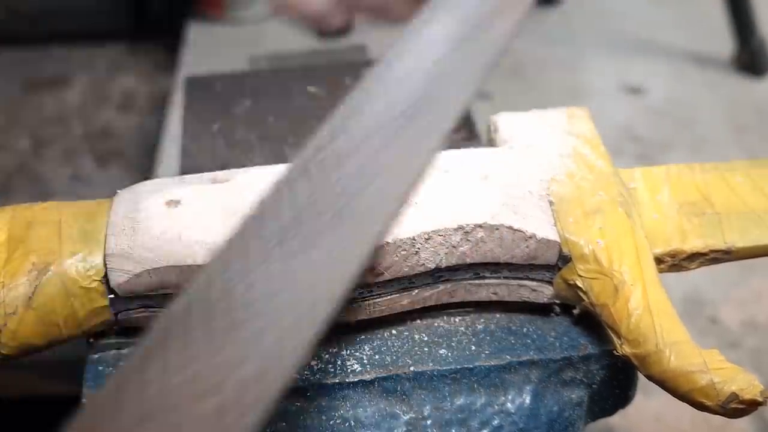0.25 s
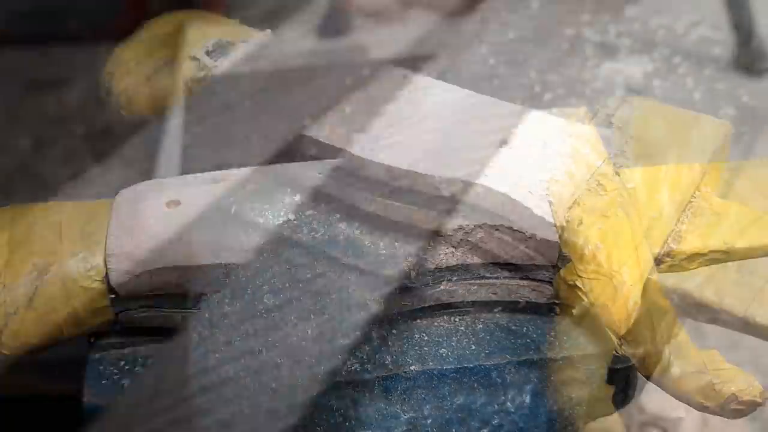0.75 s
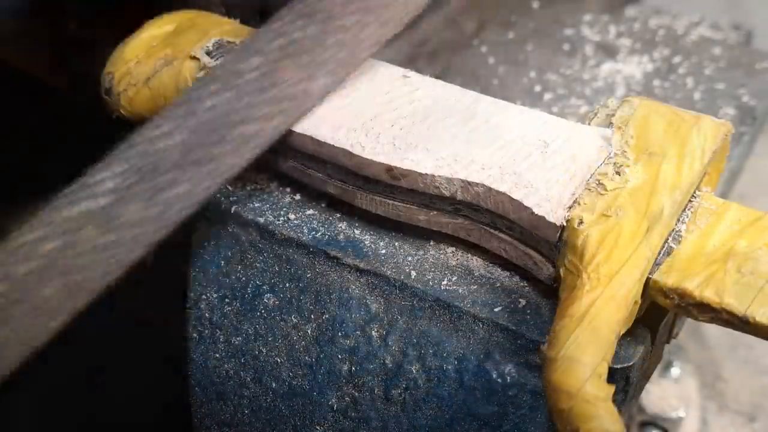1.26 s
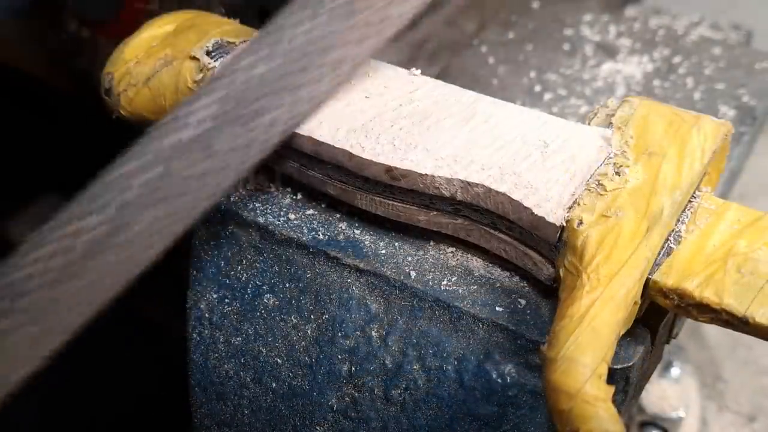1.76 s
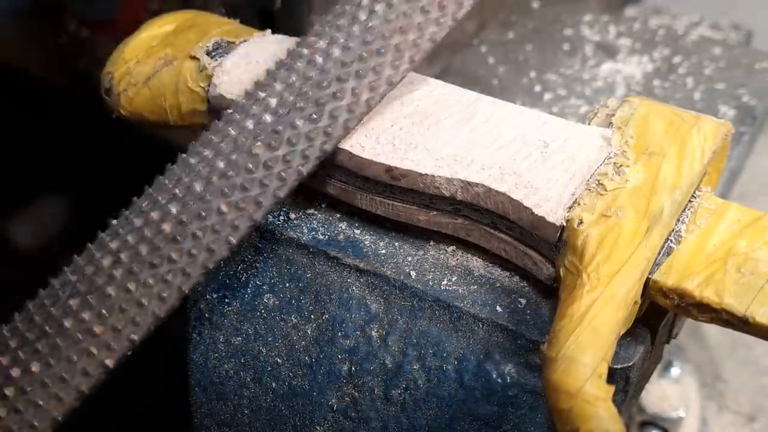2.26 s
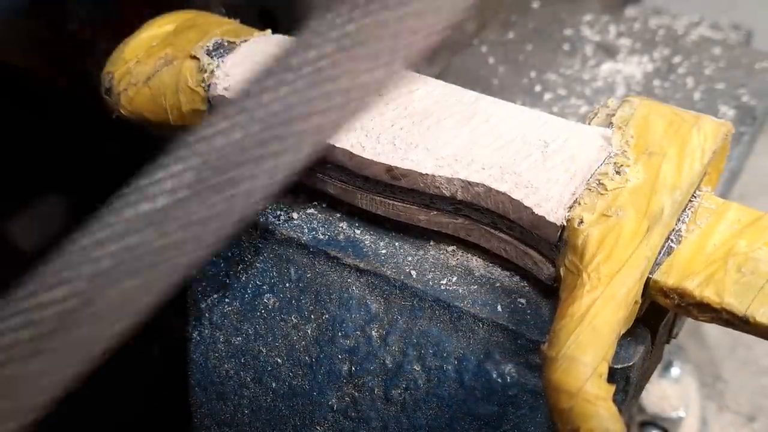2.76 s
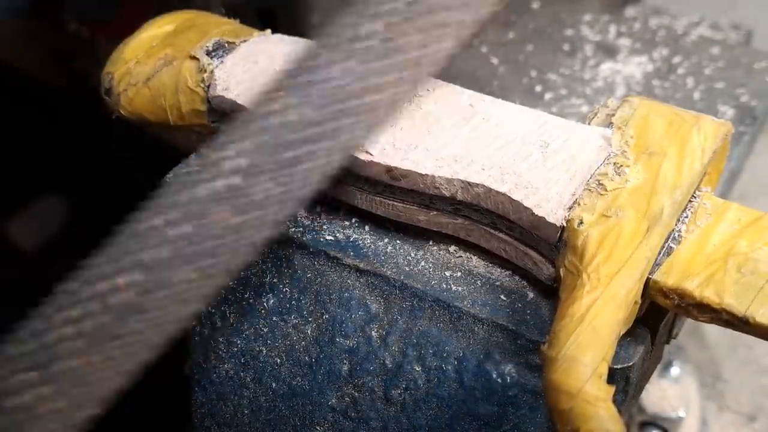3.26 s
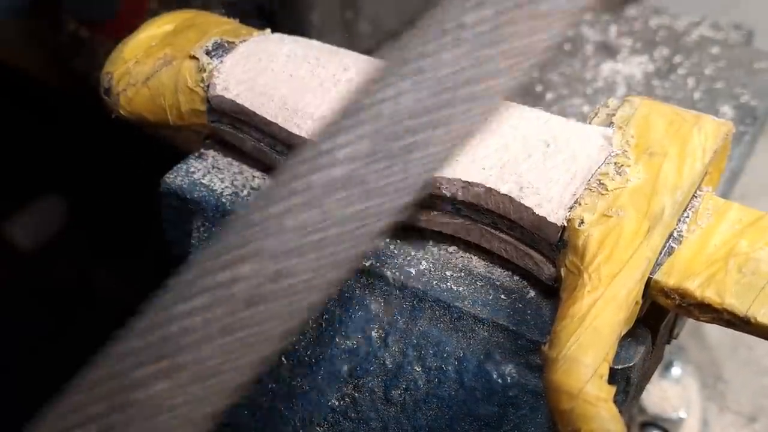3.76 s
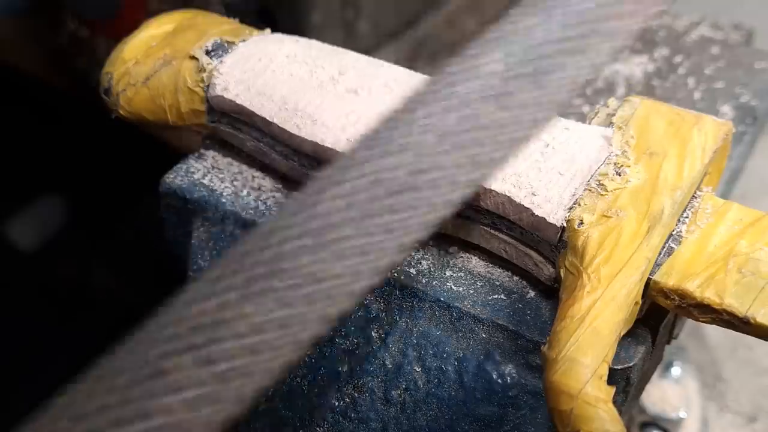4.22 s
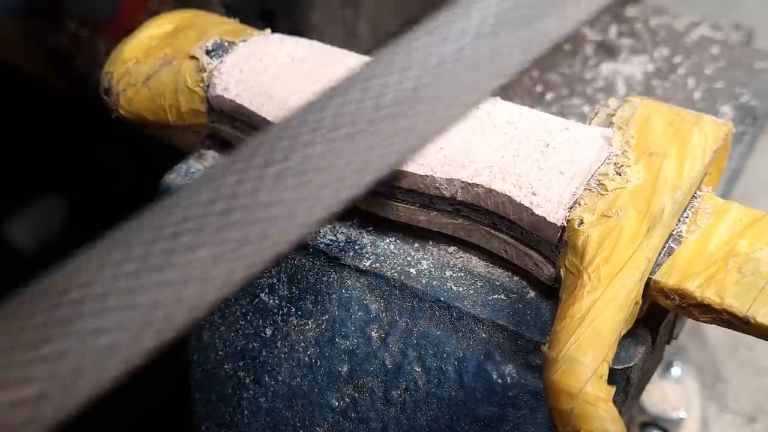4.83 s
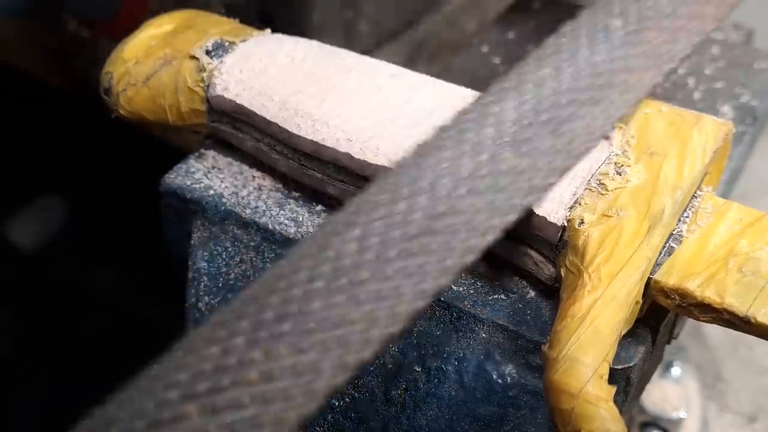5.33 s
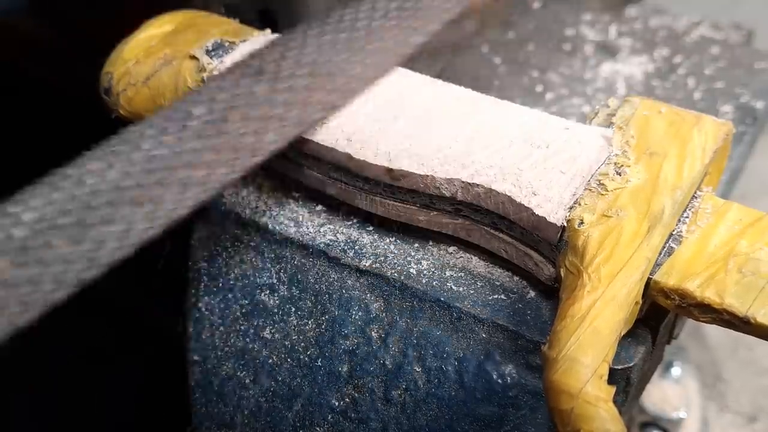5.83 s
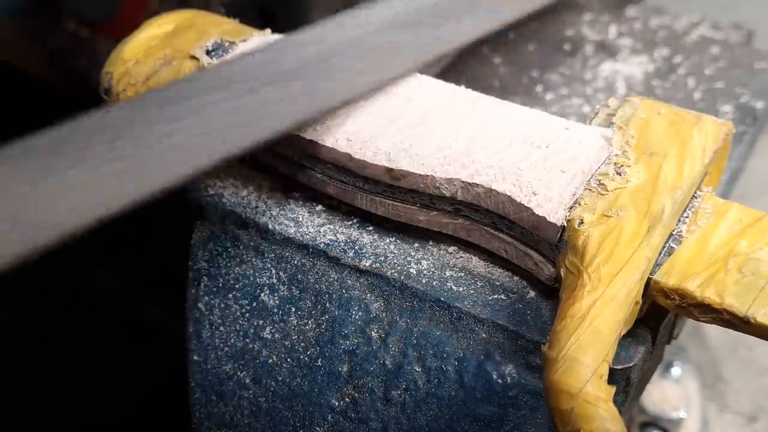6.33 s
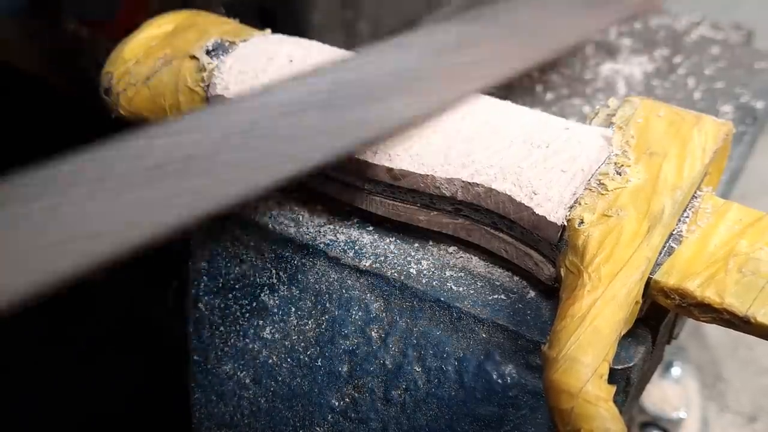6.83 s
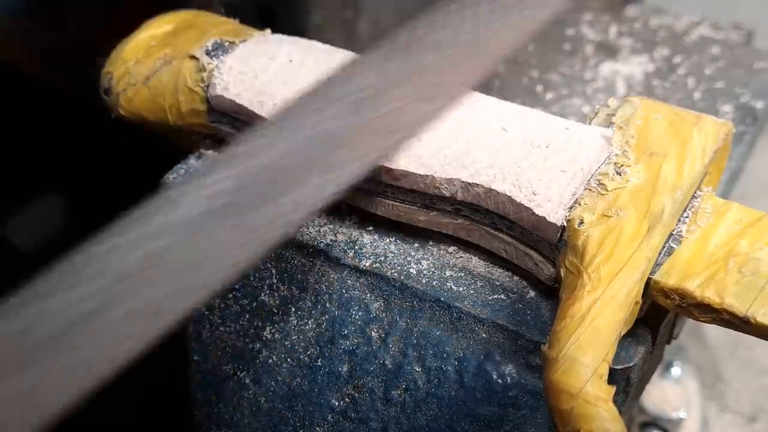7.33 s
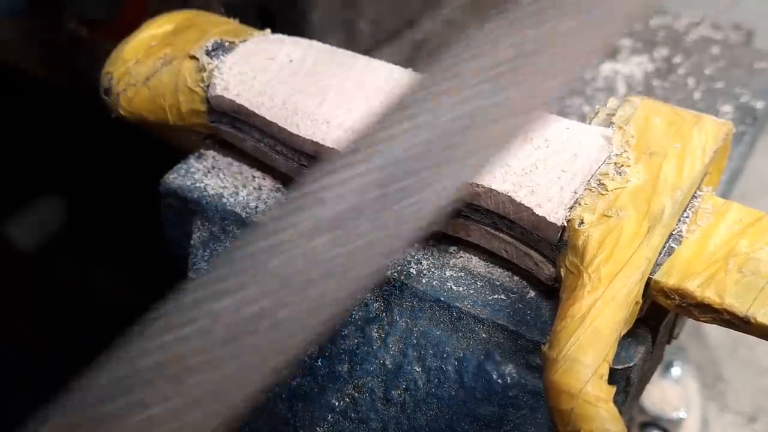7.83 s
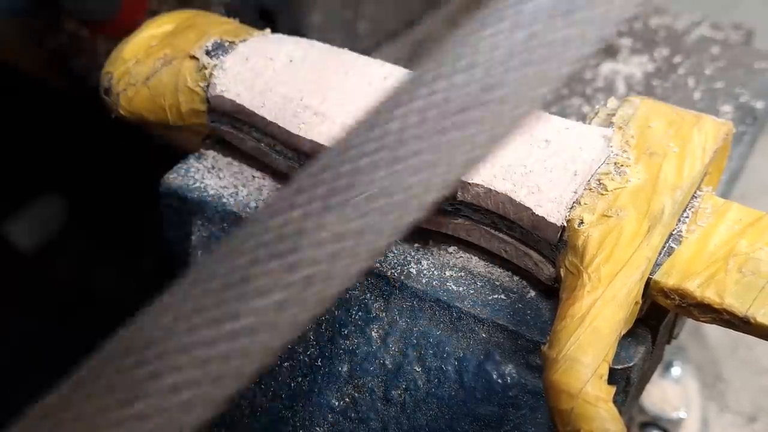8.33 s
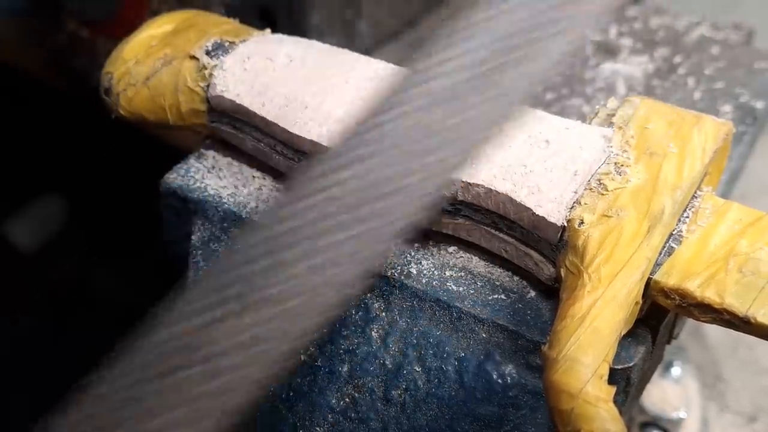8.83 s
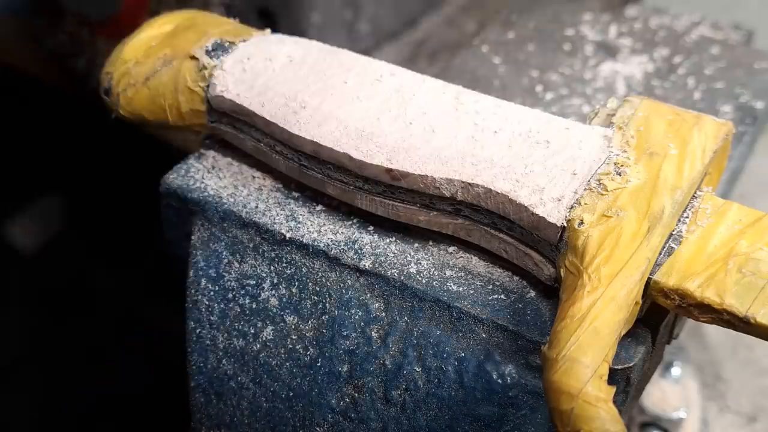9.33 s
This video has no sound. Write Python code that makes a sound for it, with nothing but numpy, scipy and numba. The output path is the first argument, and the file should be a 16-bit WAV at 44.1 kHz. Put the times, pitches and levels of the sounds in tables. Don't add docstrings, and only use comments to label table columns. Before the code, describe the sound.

Dry, close filing in a still workshop: gritty rasp teeth bite wood with a dense, ringing steel scratch. After a few hesitant strokes and set-down ticks comes rapid to-and-fro scraping, with a brief break in pace before a fuller run, then slower, longer strokes to the end. Low wooden judder sits under each push, with little room echo and faint air noise.

```python
import sys
import numpy as np
from scipy import signal
from scipy.fft import rfft, irfft
from scipy.io import wavfile
from scipy.ndimage import uniform_filter1d
from numba import njit

SR = 44100
rng = np.random.default_rng(int(sys.argv[2]) if len(sys.argv) > 2 else 0)


def persist_wave(psi):
    counts = np.round(np.clip(psi, -1, 1) * 32767).astype(np.int16)
    wavfile.write(sys.argv[1], SR, np.atleast_2d(counts).T)


def amplitude_ratio(level_db):
    exponent = np.asarray(level_db, float) / 20
    return 10 ** exponent


N = 422478
T = np.arange(N) / SR


def unit(x):
    return x / np.sqrt(np.mean(x ** 2))


def walk(rate):
    hold = int(SR / rate)
    levels = rng.standard_normal(N // 20 + 1)[:N // hold + 1]
    return uniform_filter1d(np.repeat(levels, hold), hold)[:N]


@njit
def moving_resonance(x, hz, width):
    y, band, low = np.empty(len(x)), 0., 0.
    for i in range(len(x)):
        g, k = np.tan(np.pi * hz[i] / SR), width[i] / hz[i]
        v = (band + g * (x[i] - low)) / (1 + g * (g + k))
        band, low, y[i] = 2 * v - band, low + 2 * g * v, k * v
    return y


def body(x, modes):
    total = 0
    for k, (hz, width, db) in enumerate(modes):
        b, a = signal.iirpeak(hz, hz / width, SR)
        total = total + (-1) ** k * amplitude_ratio(db) * signal.lfilter(b, a, x)
    return total


# (f/Hz, level/dB per Hz)
SHOP_SPECTRUM = [(18, -40), (30, -14), (195, -18.5), (296, -19.5), (1820, -24.5), (3540, -25.5),
                 (5380, -30), (10700, -35.5), (13900, -60.5), (22000, -120)]
SHOP_DB = -80.5
EARLY_SHOP_DB, EARLY_UNTIL_S = -2, 0.78


def shop():
    hz, db = np.transpose(SHOP_SPECTRUM)
    colour = amplitude_ratio(np.interp(np.log(np.fft.rfftfreq(N, 1 / SR) + 1), np.log(hz), db))
    air = unit(irfft(rfft(rng.standard_normal(N)) * colour, N))
    return air * amplitude_ratio(SHOP_DB + EARLY_SHOP_DB * (T < EARLY_UNTIL_S) + 1.5 * walk(11.0))


# (t/s, length/s, blade level/dB, swell over the stroke/dB, vice shudder level/dB)
FIRST_PUSHES = [(.182, .19, -34, 6.5, -34.5), (.62, 0.19, -36, -5.5, -40.5), (.92, 0.083, -43, 6.5, -45.5),
                (1.066, .165, -42, 0, -48.5)]
FIRST_PULLS = [(0.13, 0.042, -53, -11.5, -45.5), (.788, 0.1, -45, 0, -43.5), (1.036, .06, -44, -2, -47)]
QUICK_PUSHES = [(1.315, 0.11, -31, 0.15, -29), (1.528, 0.095, -27.4, -3.6, -29),
                (1.718, 0.08, -29, 1.8, -29.5), (1.907, 0.067, -36, 11, -30.5),
                (2.253, 0.1, -32, -3.5, -29), (2.444, 0.091, -30, -3.9, -26.5),
                (2.807, 0.12, -28, -11.5, -22), (3.007, 0.11, -27, -3, -23),
                (3.217, 0.104, -26, -0.5, -30.5), (3.418, 0.12, -26, 4, -20.5),
                (3.638, 0.097, -24.5, -5.5, -24), (3.831, 0.089, -27.5, -1, -29.8),
                (4.011, 0.099, -29, -2, -29), (4.21, 0.1, -28.5, -4, -32.5), (4.41, 0.1, -26.5, 4.5, -31),
                (4.605, 0.094, -28.5, -7, -47), (4.793, 0.11, -36, -13, -44.5)]
QUICK_PULLS = [(1.259, 0.064, -40, 0, -32.5), (1.426, 0.098, -44.5, 8, -36.5), (1.619, 0.093, -31, 0, -40),
               (1.803, 0.095, -41, -6, -40.5), (1.996, 0.077, -41.2, -19, -44),
               (2.171, 0.082, -64.5, 25, -52), (2.348, 0.094, -32.5, -0.5, -37.5),
               (2.529, 0.055, -37, 17, -35.5), (2.571, 0.051, -41, -16.5, -37.5),
               (2.745, 0.063, -40.5, 1, -57), (2.924, 0.089, -26.5, 0.5, -35),
               (3.136, 0.082, -25, -3.5, -43.5), (3.372, 0.046, -39.5, -6.5, -76.5),
               (3.554, 0.078, -29.5, 4.5, -42), (3.737, 0.092, -29.5, 0, -40),
               (3.921, 0.086, -31, 2, -46.5), (4.112, 0.099, -27, -1.5, -46),
               (4.315, 0.099, -29, -2, -45.5), (4.513, 0.094, -32, -9, -56), (4.704, 0.094, -31, -1, -49.8)]
LONG_PUSHES = [(5.051, 0.12, -32, 2.5, -35.5), (5.337, 0.11, -30.5, -1, -34),
               (5.619, 0.14, -32.2, 0.2, -35), (5.932, 0.14, -32.5, -5.5, -39),
               (6.237, 0.13, -33, 2.5, -32.5), (6.521, 0.15, -33, -3, -32.5), (6.854, 0.14, -34.5, -4, -30),
               (7.183, 0.14, -35.5, 4.5, -35.5), (7.508, 0.16, -27, -11.5, -29.5),
               (7.844, 0.176, -25, -4, -28), (8.214, 0.16, -26, 9, -25), (8.558, 0.14, -27.5, -1.5, -29),
               (8.856, 0.15, -27.5, -2, -29.5), (9.171, 0.12, -26.0, 5, -32)]
LONG_PULLS = [(4.912, 0.12, -31.5, -13.5, -60), (5.179, 0.14, -28.5, 1, -64),
              (5.466, 0.14, -29.5, 0.5, -63), (5.778, 0.14, -30, -1, -54.5),
              (6.081, 0.14, -36, -7.5, -41.5), (6.417, 0.096, -36.5, -15.5, -41),
              (6.679, 0.17, -34, -2, -52), (7.015, 0.17, -32.5, -2, -44), (7.331, 0.16, -32, -1, -66.5),
              (7.739, 0.095, -32.5, -7, -42), (8.027, 0.18, -31.5, -17, -58),
              (8.408, 0.16, -35.5, -17.5, -58.5), (8.72, 0.13, -27, -6, -60.5),
              (9.032, 0.13, -30.5, -11.5, -60.5)]
HOVERS = [
    (0.401, .2, -86, 1.5, -79.5),
]
HAND = {"first push": (0.38, 0.37), "first pull": (0.18, 0.48), "quick push": (.42, 0.4545),
        "quick pull": (0.55, 0.73), "long push": (.33, 0.44), "long pull": (0.36, 0.5), "hover": (.45, .45)}
BITE = {"first push": (-1.5, -1.5, -2, -3, -12.5), "first pull": (-17, -20, -15.5, -26.5, -10.5),
        "quick push": (-13.5, -10, -7.5, -10.5, -8.5), "quick pull": (-17, -12, -16.5, -12.5, -6.5),
        "long push": (-7, -10, -7, -9, -14), "long pull": (-21, -22, -16, -8, -9.5),
        "hover": (-27, -27.5, -4, -3, 1.5)}
LANDINGS = [.186, 1.04, 3.382, 6.087, 6.427, 6.687, 7.752]
# (t/s, blade resonance f/Hz, roll of the wrist, tearing level/dB)
PUSH_GRIP = [(.28, 4190, .06, 3), (0.698, 3780, -0.066, 3.5), (0.961, 2800, 0.002, -7.5),
             (1.129, 4170, .06, -3), (1.37, 2960, -.02, 2), (2.5, 2854, -.05, 2), (3.061, 3330, .04, 4),
             (3.701, 3376, 0.0093, -5.5), (4.46, 3980, 0.054, -4.5), (4.85, 3830, 0.11, 12),
             (5.11, 4010, -0.31, -4.5), (5.7, 4060, -0.06, 0.5), (6.0, 3345, 0.27, 5.5),
             (6.921, 3400, 0.26, 9), (7.248, 4180, -0.085, 1), (7.929, 3170, -.04, -11.5),
             (8.629, 3280, 0.18, 1.5), (9.24, 3200, -0.15, -2.5)]
PULL_GRIP = [(.15, 3840, -.05, -6.5), (.5, 2850, .05, -7), (1.0, 2920, -.08, 0), (1.47, 2450, 0.033, 7.5),
             (1.66, 2820, -.08, 5.5), (2.97, 2700, -.08, 2), (3.4, 2900, .03, 1), (3.78, 3570, -.04, -9),
             (4.16, 3370, 0.03, -4), (4.55, 3500, -0.14, 5.5), (4.97, 3420, -0.13, -3.5),
             (5.25, 3660, .12, -8.5), (5.53, 3500, -0.037, -5), (5.85, 3186, -.2, 2), (6.14, 3166, -.24, 3),
             (6.46, 2805, -0.052, 3), (7.4, 3130, 0.0045, 1), (8.1, 3044, 0.017, 5)]
LANDING_S = .005
SPEED_POWER = 2.03
LEVEL_DB, VICE_DB, SWELL_GAIN = 0.5, -4, 1.54
SHUDDER_PEAK = 0.59
ROLL_RING_DB, ROLL_HISS_DB = -24, 44.5
SHUDDER_WOOD = 0.067
BENCH_LAG = 0.21


def strokes():
    ring, vice, bench = np.zeros(N), np.zeros(N), np.zeros(N)
    grip = np.tile([[3000.], [-20], [-20], [0], [0]], N)
    tables = FIRST_PUSHES, FIRST_PULLS, QUICK_PUSHES, QUICK_PULLS, LONG_PUSHES, LONG_PULLS, HOVERS
    for manner, rows in zip(HAND, tables):
        up, down = HAND[manner]
        hiss_db, wood_db, early_db, late_db, bench_db = BITE[manner]
        when, *columns = np.transpose(PUSH_GRIP if "push" in manner else PULL_GRIP)
        for s, length, db, swell_db, vice_db in rows:
            span = slice(int(s * SR), int((s + 1.3 * length) * SR))
            u = (T[span] - s) / length
            landing = [t for t in LANDINGS if abs(t - s) < .015]
            rise = (T[span] - landing[0]) / LANDING_S if landing else u / up
            speed = np.sin(np.pi / 2 * np.clip(np.minimum(rise, (1 - u) / down), 0, 1))

            hz, roll, tear_db = (np.interp(s + length / 2, when, column) for column in columns)
            roll = roll * (np.clip(u, .2, .8) - .5) / .6
            ring_db = db + LEVEL_DB + SWELL_GAIN * swell_db * (u - .5) + ROLL_RING_DB * roll
            now = speed ** SPEED_POWER * amplitude_ratio(ring_db)
            hiss = hiss_db + tear_db + ROLL_HISS_DB * roll
            wood = wood_db + SHUDDER_WOOD * (vice_db - db + 3) + 0 * u
            hold = np.stack([hz * (1 + roll), hiss, wood, roll, u])
            grip[:, span] = np.where(now >= ring[span], hold, grip[:, span])
            ring[span] = np.maximum(ring[span], now)

            start_db = early_db - (6 if landing else 25)
            course_db = [start_db, early_db, 0, late_db, late_db - 39]
            shake = amplitude_ratio(vice_db + VICE_DB + np.interp(u, [0, .2, SHUDDER_PEAK, .9, 1.3], course_db))
            vice[span] = np.maximum(vice[span], shake)
            bench_shake = shake * amplitude_ratio(bench_db - BENCH_LAG * (vice_db + 39))
            bench[span] = np.maximum(bench[span], bench_shake)
    return ring, vice, bench, uniform_filter1d(grip, 200, axis=1)


def teeth(rate, spread_db, chatter_db, chatter_rate):
    when, size, sign = rng.random(N), rng.exponential(size=N), rng.standard_normal(N)
    clicks = (when < rate / SR) * sign * amplitude_ratio(spread_db * size)
    return unit(clicks * amplitude_ratio(chatter_db * walk(chatter_rate)))


def tooth_rows(hz):
    phase = np.cumsum(hz * (1 + 0.059 * walk(90))) / SR
    return unit(np.diff(np.floor(phase), prepend=0) * amplitude_ratio(3 * walk(200)))


# (f/Hz, width/Hz, level/dB)
BENCH = [(97.7, 22, 1), (165.3, 15, -2)]
VICE = [(158.4, 12, 2), (182.4, 29.3, 2.5), (255.3, 60.5, 1), (375, 34, -0.5), (422, 101, -5.5),
        (581, 48, -5.5)]
WOOD = [(690, 110, 8), (960, 300, -3.5), (1129, 45, -3), (1300, 420, 4), (1660, 70, 4), (2140, 260, 1.5)]
STEEL = [(2108, 196, 5), (2837, 500, 5.5), (3500, 24, -24), (3884, 130, 8), (4384, 900, 3.5)]
FIBRE = [(5140, 1500, 16.5), (6030, 456, 14.5), (6400, 200, 16.5), (6690, 320, -23.5), (8200, 780, -18),
         (9350, 2900, -9.5)]
# (t/s, tooth-row rate at mid stroke f/Hz, bench shudder level/dB)
PACE = [(.3, 227, -4), (1.4, 195, 3.5), (1.948, 237, 2), (2.3, 202, 7.5), (2.55, 187, -2), (2.87, 184, 1),
        (3.07, 245, -2.5), (3.3, 216, 4.5), (3.48, 221, -6), (4.3, 246, -4), (5.2, 220, 3.5),
        (6.3, 248, -3), (6.75, 250, 0), (7.6, 244, 1), (7.949, 217, 0), (8.3, 240, 3), (8.62, 277, -2.5),
        (9.25, 243, 4.5)]
ROWS_GAIN, ROWS_DB = .4, -0.5
ROLL_DAMP = 0.49
CORE_WIDTH, CORE_DB = .13, -2


def rasp():
    ring, vice, bench, (hz, hiss_db, wood_db, roll, progress) = strokes()
    fine, coarse = teeth(9000, 1.7, 1.4, 250), teeth(3000, 0.97, 3.5, 60)
    fine = fine + amplitude_ratio(-10.5) * teeth(120, 0.88, 0, 250)

    hz = hz * (1 + .025 * walk(30))
    width = hz * np.clip(0.47 + 0.0096 * wood_db + ROLL_DAMP * roll, .1, 1)
    free = moving_resonance(moving_resonance(fine, hz, width), hz, 3.15 * width) / np.sqrt(width)
    others = moving_resonance(np.roll(fine, N // 2), .85 * hz, .5 * hz)
    core = moving_resonance(fine, hz * (1 + .06 * walk(45)), CORE_WIDTH * hz)
    core = amplitude_ratio(CORE_DB) * unit(moving_resonance(core, hz, width))
    core = core / (1 + 8 * np.maximum(roll, 0))
    blade = unit(unit(free) + core + amplitude_ratio(-2.5) * unit(body(others, STEEL)))
    hiss = amplitude_ratio(hiss_db - 4.0) * unit(body(fine, FIBRE))

    grate = amplitude_ratio(wood_db + 3.5) * ring ** 0.47 * np.minimum(vice, 3 * ring + 1e-3) ** 0.5
    when, rows_hz, bench_db = np.transpose(PACE)
    row_rate = np.interp(T, when, rows_hz) * (1 + ROWS_GAIN * (progress - .5))
    judder = unit(coarse + amplitude_ratio(ROWS_DB) * tooth_rows(row_rate))
    bench = bench * amplitude_ratio(np.interp(T, when, bench_db))

    skip = amplitude_ratio(np.clip(1.2 - .09 * wood_db, 0, 5) * walk(130))
    out = ring * skip * (blade + hiss)
    for x, drive, modes in ((coarse, grate, WOOD), (judder, vice, VICE), (coarse, bench, BENCH)):
        out = out + body(x * drive, modes) / np.std(body(x, modes))
    return out


# (t/s, peak level/dB, f/Hz, decay T60/s)
KNOCKS = [
    (0.136, -36, 4230, 0.082),
    (0.5144, -45.5, 4200, 0.026),
    (0.6, -32.5, 4200, 0.086),
    (1.011, -37.5, 3990, 0.14),
    (2.216, -53, 2660, 0.04),
    (2.231, -52, 2930, 0.052),
    (2.752, -65, 2855, 0.037),
]


def knocks():
    out, t = np.zeros(N), T[:6000]
    for s, db, hz, t60 in KNOCKS:
        decay = 1000. ** (-t / t60) + 2 * 1000. ** (-t / .008)
        grit = rng.standard_normal(len(t)) * decay
        hz, width = hz + 0 * t, 0.19 * hz + 0 * t
        ring = unit(moving_resonance(moving_resonance(grit, hz, width), hz, width))
        ring = ring + amplitude_ratio(-7.5) * unit(body(grit, VICE + WOOD))
        ring = ring + amplitude_ratio(-18.5) * unit(body(grit, FIBRE))
        out[int(s * SR):][:len(t)] += amplitude_ratio(db) * ring / np.abs(ring).max()
    return out


def shuffle():
    start_s, length_s, top_hz, level_db = .45, .07, 170, -59.5
    band = signal.butter(4, [25, top_hz], "bandpass", fs=SR, output="sos")
    rumble = unit(signal.sosfilt(band, rng.standard_normal(N)))
    return rumble * amplitude_ratio(level_db) * np.exp(-((T - start_s) / length_s) ** 2)


# (t/s, f/Hz, level/dB)
BIRD = [(2.671, 3960, -99), (2.699, 4450, -86), (2.761, 4035, -99), (9.521, 3730, -99), (9.57, 3580, -82)]


def bird():
    s, hz, db = np.transpose(BIRD)
    pitch = np.interp(T, s, hz) * (1 + .01 * walk(200))
    tone = np.sin(2 * np.pi * np.cumsum(pitch) / SR)
    return tone * amplitude_ratio(np.interp(T, s, db))


def scene():
    near = rasp() + knocks()
    tail = rng.standard_normal(6000) * 1000. ** (-T[:6000] / .09)
    walls = signal.fftconvolve(near, tail / np.sqrt(np.sum(tail ** 2)))[:N]
    radiation = signal.butter(6, 78, "highpass", fs=SR, output="sos")
    near = signal.sosfilt(radiation, near + amplitude_ratio(-20) * walls)
    sides = amplitude_ratio(-2) * shop() * np.array([[1], [-1]])
    return near + bird() + shuffle() + shop() + sides


def low_pass(x):
    return signal.sosfilt(signal.butter(12, 15760, fs=SR, output="sos"), x)


def record(dry):
    top_hz = 10800
    dry = np.tanh(4.5 * dry) / 4.5
    cut = signal.sosfilt(signal.cheby2(12, 60, top_hz + 650, fs=SR, output="sos"), dry)
    fuzz = signal.sosfilt(signal.butter(6, [12500, 15700], "bandpass", fs=SR, output="sos"), dry)
    fuzz *= amplitude_ratio(-23) * (np.abs(T - 3.8) < 3)
    treble = signal.sosfilt(signal.butter(4, 4600, "highpass", fs=SR, output="sos"), cut)
    slip = amplitude_ratio(-7) * np.exp(-((T - .26) / .02) ** 4) * treble * np.array([[1], [-1]])
    return low_pass(cut + fuzz + slip)


dry = scene()
out = record(dry)
persist_wave(out)
```